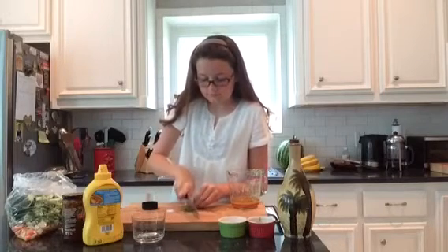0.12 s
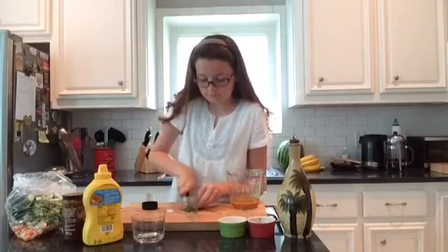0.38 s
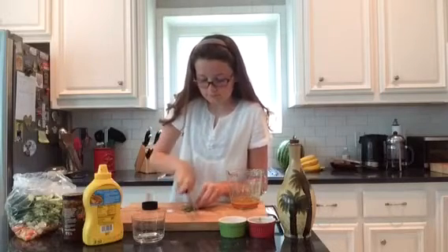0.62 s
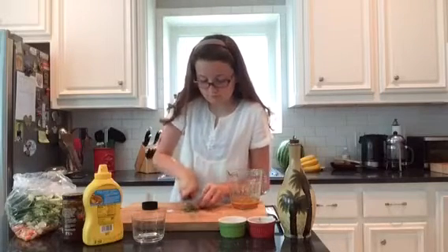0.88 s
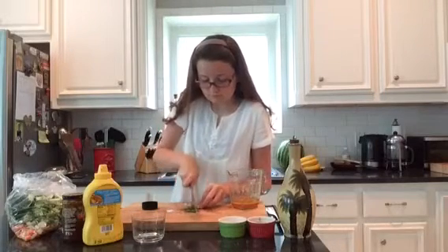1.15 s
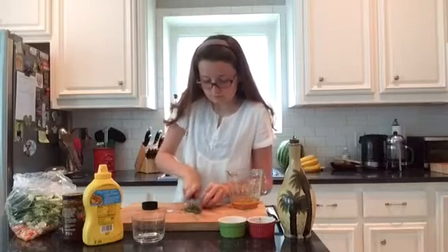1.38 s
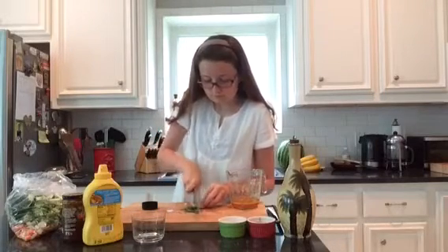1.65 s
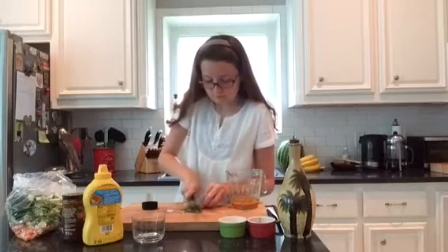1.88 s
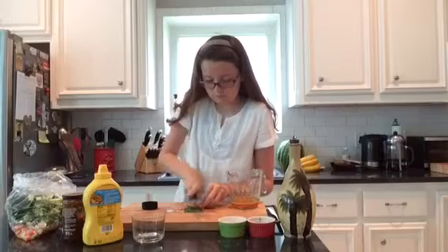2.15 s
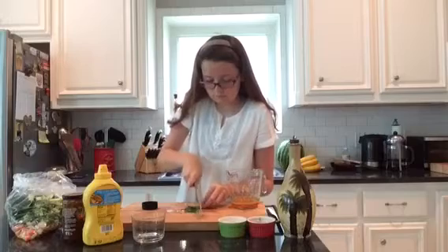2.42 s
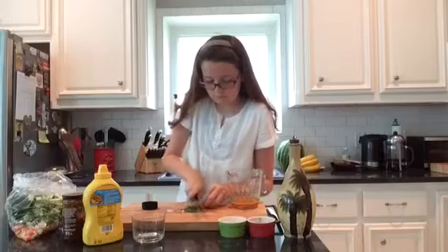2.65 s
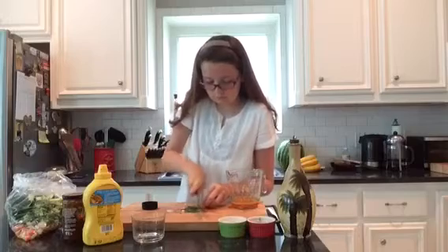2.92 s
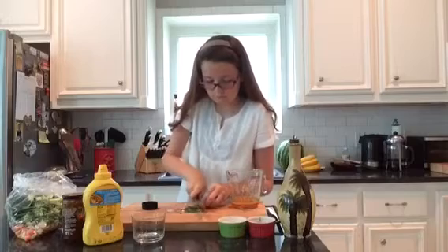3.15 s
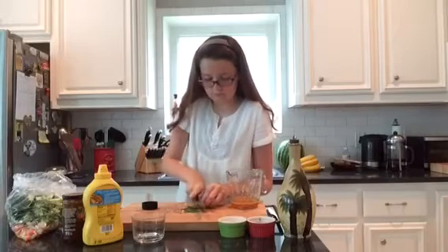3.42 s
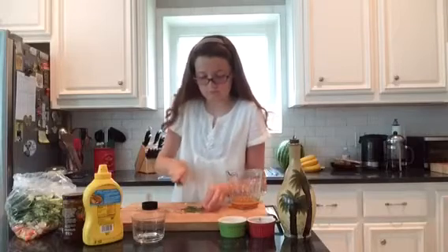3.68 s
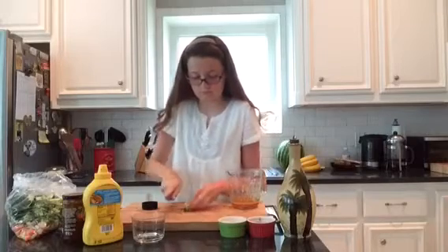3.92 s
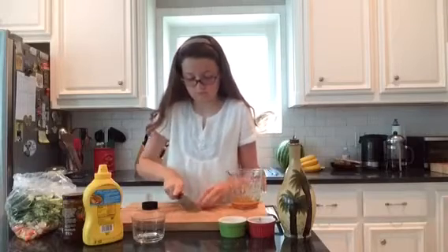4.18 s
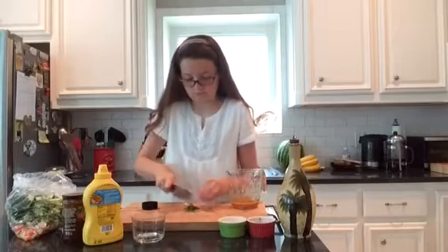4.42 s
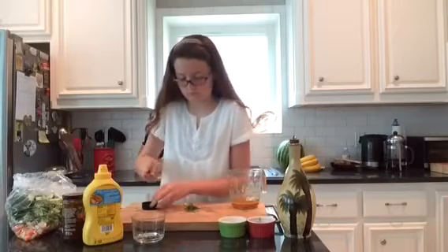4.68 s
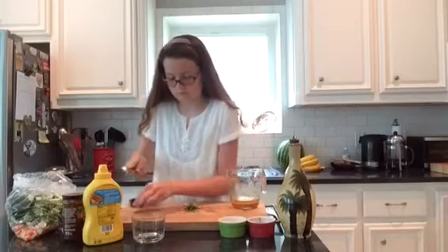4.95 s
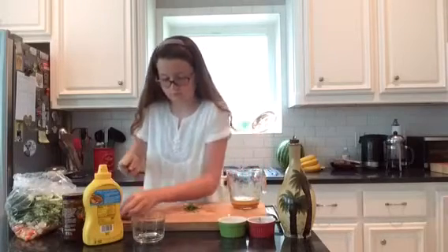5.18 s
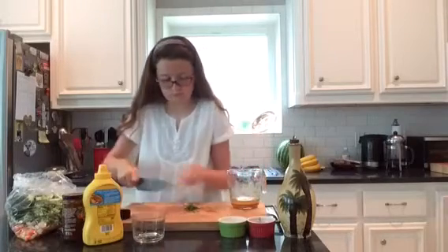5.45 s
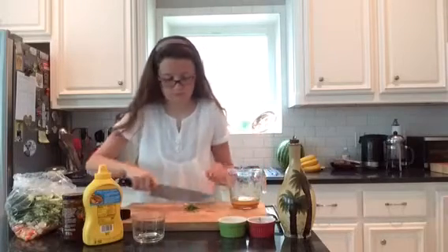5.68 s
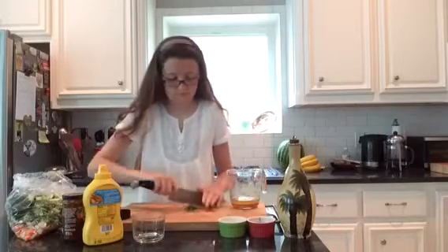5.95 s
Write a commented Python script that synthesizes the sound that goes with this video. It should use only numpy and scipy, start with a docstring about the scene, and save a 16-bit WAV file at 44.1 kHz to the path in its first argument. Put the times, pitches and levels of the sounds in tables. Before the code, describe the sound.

A knife minces herbs on a wooden board, heard from a couple of metres away in a reflective home kitchen, over dull room air and a faint low fridge hum. Light touches start at once, then firm hollow knocks land at about 0.2, 0.7, 1.1, 1.9 and 3.4 seconds, with weaker taps scattered unevenly between. Thin gritty leaf crunch, tiny bright stem snaps and brief woody scrapes of the edge fill the gaps, above a barely audible rubbing that fades after 3.2. The taps thin out, and at 4.0 a clearly louder, sharper chop rings off the walls, followed by a short scraping sweep around 4.1 to 4.3. Then mostly quiet room tone, with a minute tick near 4.9 and a small hard click with a faint brush at 5.3. At 6.0 a second loud, bright, cracking chop lands just as the sound ends.

```python
"""Mincing herbs on a wooden board

A kitchen knife minces herbs a couple of metres away. Grains of noise make the leaves crunch, noise through
the board's resonances makes the blade slide, and short pushes on those resonances make it knock. Short
bright bursts are snapping stems. A hard-walled kitchen answers with echoes and a noise tail, over a
fridge's hum and room air made of filtered noise."""
import sys
import numpy as np
from scipy import signal
from scipy.fft import rfft, irfft, next_fast_len
from scipy.io import wavfile
from scipy.ndimage import uniform_filter1d, map_coordinates

SR = 44100
rng = np.random.default_rng(int(sys.argv[2]) if len(sys.argv) > 2 else 0)


def natural_amplitude(level_db):
    """Convert a level in decibels to a linear amplitude factor, elementwise."""
    exponent = np.asarray(level_db, float) / 20
    return 10 ** exponent


def persist_wave(psi):
    """Save psi, clipped to +-1, as 16-bit WAV."""
    counts = np.round(np.clip(psi, -1, 1) * 32767).astype(np.int16)
    wavfile.write(sys.argv[1], SR, np.atleast_2d(counts).T)


N = 268128  # length in samples

# blade meeting the wood: start_s, level_db (peak of the low part), upper_db (upper modes over the low part),
# centre_hz (of the upper modes), contact_ms
BLADE_KNOCKS = [(0.03, -49, -12, 1390, 0.37), (0.07, -34.5, -18, 1280, 1), (0.196, -22.5, -30, 1420, 0.84),
                (0.459, -50, -8.5, 1340, 0.72), (0.675, -26, -69, 1440, 1), (0.909, -45, -8, 1380, 0.63),
                (1.13, -22.5, -18.5, 1430, 0.85), (1.352, -44, -25, 1400, 1),
                (1.601, -44.5, -24, 1470, 0.98), (1.654, -46.5, -25, 1470, 0.84),
                (1.781, -42, -12.5, 1330, 1), (1.91, -21.5, -26, 1340, 0.92), (2.008, -49, -14, 1340, 0.87),
                (2.11, -50.5, -5.5, 1500, 0.46), (2.234, -52.5, -8, 1920, 0.42),
                (2.362, -35.5, -19, 1350, 1), (2.477, -45.5, -19, 1330, 1), (2.661, -47, -11, 1350, 0.25),
                (2.803, -48, -12, 1950, 0.82), (2.886, -49, -21, 1450, 0.82),
                (3.055, -38.5, -15, 1330, 0.45), (3.097, -42.5, -7.5, 1820, 0.23),
                (3.293, -46.5, -16, 1900, 0.3), (3.41, -21.5, -19, 1950, 0.99),
                (3.531, -55, -15, 1400, 0.78), (3.562, -48.5, -18, 1530, 0.73),
                (3.865, -48, -7, 1400, 0.85), (4.027, -14, -5, 1330, 0.22), (5.279, -46.5, -10, 1200, 1),
                (6.0, -16.5, 1, 1510, 0.11)]
# stems snapping and small hard contacts: start_s, level_db, pitch_hz, ringing (share, 0-1)
STEM_SNAPS = [(0.037, -46, 9420, 0.4), (0.0493, -43, 11200, 0.23), (0.4579, -55, 3530, 0.05),
              (0.4977, -38.5, 6600, 0.2), (0.5178, -41, 11200, 0.2), (0.532, -43, 11000, 0.3),
              (0.588, -49, 11500, 0.35), (0.93, -53, 12000, 0.5), (0.912, -42.5, 7100, 0.13),
              (0.986, -45.5, 11100, 0.2), (1.206, -54, 8500, 0.6), (1.5093, -55.5, 6640, 0.2),
              (1.58, -59, 10000, 0.3), (1.6917, -53.5, 9600, 0.36), (1.796, -52, 10600, 0.55),
              (1.909, -55.5, 9000, 0), (2.241, -48.5, 6270, 0.1), (2.302, -42.5, 11500, 0.42),
              (3.056, -46, 10960, 0.45), (3.098, -39, 2970, 0.32), (3.4096, -36.5, 2730, 0.52),
              (4.901, -58, 9490, 0.2), (5.271, -36, 2720, 0.64), (5.9998, -46, 2920, 0.9)]
# low resonances of the board: pitch_hz, width_hz, level_db
BOARD_MODES = [(382, 60, -10), (441, 152, 4), (574, 53, 7.5), (626, 143, 6), (777, 35, 6), (995, 40, -2)]
# upper resonances of the board: pitch_hz, width_hz, level_db
UPPER_MODES = [(1003, 90, 17.5), (1196, 73, 13), (1330, 67, 19), (1416, 54, 16.5), (1500, 52, 13),
               (1690, 78, 2), (1782, 240, 14), (1950, 70, 8.5), (2410, 220, 6), (2810, 130, -4.5)]
# tone colour of tearing leaves: pitch_hz, level_db (relative)
LEAF_COLOUR = [(1180, -65), (2000, -3.5), (3620, -2.5), (4600, -6.5), (6570, -6), (10000, -2), (11600, -4),
               (15200, -14)]
# tone colour of the room air: pitch_hz, level_db (relative)
AIR_COLOUR = [(15, -71), (25, -33), (49, -2), (143, -5), (173, -6.5), (347, -6.5), (441, -11.5),
              (505, -8.5), (609, -16.5), (818, -19.5), (1690, -30), (2210, -29.5), (7190, -36.5),
              (9400, -37), (15200, -47.5)]
# bands of the fridge's hum: pitch_hz, level_db, width_hz
FRIDGE_HUM = [(64, -74.5, 21), (117.8, -70, 4.1), (174.7, -69, 5.6), (505.7, -72, 11), (9000, -92, 72)]
# echoes off counter and cupboards: delay_s, level_db
WALL_ECHOES = [(.0045, -36), (.009, -13.5), (.0135, -16.5), (.017, -16), (.021, -16.5), (.026, -18)]
# time the kitchen's tail takes to fall 60 dB: pitch_hz, decay_s
KITCHEN_DECAY = [(300, 0.92), (700, 0.32), (1400, 0.65), (3000, 0.44), (6000, 0.86), (12000, 0.23)]
# down-cuts through the leaves, and a late brush of leaves off the blade; scene() lowers both levels:
# peak_s, crunch_db (leaves), press_db (pressure on the wood)
DOWN_CUTS = [(0.04, -54, -49), (0.498, -54.5, -48), (0.911, -57, -51), (1.0, -60, -57), (1.348, -62, -58),
             (1.79, -60.5, -68), (1.909, -60, -51.5), (2.242, -57.5, -54), (2.67, -64, -59),
             (3.06, -60, -63), (3.1, -64.5, -72), (3.41, -64.5, -57.5), (5.28, -60, -71)]
# the edge drawn over the board between cuts, and once swept across the pile; scene() lowers both levels:
# end_s, length_s, rustle_db (leaves), scrape_db (wood)
BLADE_DRAWS = [(0.357, 0.082, -62.5, -66), (0.8, 0.015, -63, -61.5), (1.235, 0.013, -62.5, -60),
               (1.71, 0.062, -72, -65.5), (2.16, 0.031, -67.5, -58), (2.545, 0.044, -70.5, -65),
               (2.957, 0.025, -71, -61.5), (3.324, 0.017, -70.5, -73.5), (3.63, 0.028, -71, -67),
               (4.208, 0.11, -61, -53.5), (4.278, .04, -61.5, -57)]


def unit(x):
    """Scales a sound to an average (rms) level of 1."""
    return x / np.sqrt(np.mean(x ** 2) + 1e-20)


def peak_one(x):
    """Scales a sound to a peak of 1."""
    return x / np.abs(x).max()


def along(points, hz):
    """Reads a curve of (Hz, value) points on a log pitch axis."""
    point_hz, value = np.transpose(points)
    return np.interp(np.log(hz + 1), np.log(point_hz + 1), value)


def wobble(rate):
    """Makes a smooth random curve with `rate` random points a second."""
    points = rng.standard_normal(int(N * rate / SR) + 4)
    return map_coordinates(points, [np.arange(N) * rate / SR])


def filtered(x, response):
    """Filters x by multiplying its spectrum by a response of frequency."""
    size = next_fast_len(len(x) + SR // 2)
    spectrum = rfft(x, size) * response(np.fft.rfftfreq(size, 1 / SR))
    return irfft(spectrum, size)[:len(x)]


def resonances(modes, spread_db=0):
    """Gives the response of modes that ring after a push, each at a strength varied by spread_db."""
    change_db = rng.normal(0, 1, len(modes)) * spread_db

    def response(f):
        return sum(natural_amplitude(db + change) * 1j * f * width / (hz * hz - f * f + 1j * f * width)
                   for (hz, width, db), change in zip(modes, change_db))
    return response


def swells(end_s, hold_s, db, rise_db_s, fall_db_s):
    """Gain of events that rise, hold and fall at steady dB rates, added in power."""
    t = np.arange(N)[None] / SR
    end, hold, level = [np.reshape(column, (-1, 1)) for column in (end_s, hold_s, db)]
    early = np.maximum(end - hold - t, 0)
    late = np.maximum(t - end, 0)
    level_db = level - rise_db_s * early - fall_db_s * late
    return np.sqrt(np.sum(natural_amplitude(2 * level_db), axis=0))


def room_tone():
    """Dull room air is shaped noise; a fridge's hum is noise in slightly unsteady narrow bands."""
    air_db = -61 + 0.8 * wobble(3)
    air = natural_amplitude(air_db) * unit(filtered(rng.standard_normal(N), lambda f: natural_amplitude(along(AIR_COLOUR, f))))
    hum = [natural_amplitude(db) * unit(filtered(rng.standard_normal(N), resonances([(hz, width, 0)])))
           for hz, db, width in FRIDGE_HUM]
    return air + sum(hum)


def kitchen(x, wet_db):
    """Near surfaces echo, with a diffuse noise tail drawn afresh every quarter second for smoothness."""
    out = np.zeros(N + 2 * SR)
    size = SR // 4
    for start in range(0, N, size):
        hz, t, z = signal.stft(rng.standard_normal(SR), SR, nperseg=256)
        decay = natural_amplitude(-60 * t / along(KITCHEN_DECAY, hz)[:, None])
        tail = signal.istft(z * decay, SR, nperseg=256)[1][:SR]
        tail *= np.minimum(np.arange(SR) / SR / 0.0035, 1)  # the tail builds up over 3.5 ms
        tail *= natural_amplitude(wet_db) / np.linalg.norm(tail)
        for delay_s, db in WALL_ECHOES:
            tail[round(delay_s * SR)] += natural_amplitude(db)
        answer = signal.fftconvolve(x[start:start + size], tail)
        out[start:start + len(answer)] += answer
    return x + out[:N]


def snaps():
    """Each snap is a short bright burst of noise with a ring of a few cycles."""
    out, t = np.zeros(N + SR), np.arange(SR // 40) / SR
    treble = resonances([(7920, 8000, 0)])
    for start_s, db, hz, ringing in STEM_SNAPS:
        burst = rng.standard_normal(len(t)) * np.sqrt(t) * natural_amplitude(-60 * t / 0.012)
        mode = resonances([(hz, 800, 0)])
        ring = peak_one(filtered(burst, lambda f: mode(f) ** 2))
        click = peak_one(filtered(burst, lambda f: treble(f) ** 2))
        snap = ringing * ring + (1 - ringing) * click
        out[round(start_s * SR):][:len(t)] += natural_amplitude(db) * snap
    return out[:N]


def effort():
    """Gains of crunch, slide and scrape follow the cuts, the draws and a faint steady bed."""
    cut_s, crunch_db, press_db = np.transpose(DOWN_CUTS)
    end_s, length_s, rustle_db, scrape_db = np.transpose(BLADE_DRAWS)

    def draw(db, fall_db_s):
        return swells(end_s, length_s, db, 142, fall_db_s)

    def bed(db):
        # a faint steady rubbing lies under the strokes and fades after 3.23 s
        return swells(3.23, 3.23, db, 0, fall_db_s=32)

    scrape = draw(scrape_db, fall_db_s=94)
    crunch = swells(cut_s, 0, crunch_db, rise_db_s=450, fall_db_s=121)
    crunch = crunch + draw(rustle_db, fall_db_s=246) + bed(-84.5)
    slide = swells(cut_s, 0, press_db, rise_db_s=291, fall_db_s=81.5)
    slide = slide + natural_amplitude(-0.5) * scrape + bed(-69)  # a draw also stirs the low modes
    return crunch, slide, scrape + bed(-81)


def leaf_crunch():
    """Leaves tear in dense uneven grains, with a tone colour that varies at random over pitch and time."""
    grains = (rng.random(N) < 0.03) * natural_amplitude(3.5 * rng.standard_normal(N)) * rng.standard_normal(N)
    ticks = (rng.random(N) < 60 / SR) * rng.standard_normal(N)  # about 60 a second make the crunch gritty
    tearing = unit(grains) + 2.8 * rng.standard_normal(N) + 25 * ticks
    crunch = unit(filtered(tearing, lambda f: natural_amplitude(along(LEAF_COLOUR, f))))
    z = signal.stft(crunch, nperseg=256)[2]
    colour = uniform_filter1d(rng.standard_normal(z.shape), size=7, axis=0)  # smooth over pitch
    colour = uniform_filter1d(colour, size=9, axis=1)  # smooth over time
    crunch = unit(signal.istft(z * natural_amplitude(1.8 * unit(colour)), nperseg=256)[1][:N])
    return natural_amplitude(1.64 * wobble(70)) * crunch


def stroke():
    """Leaves crunch while the edge, sticking and slipping on the grain, rubs the board's modes."""
    crunch_gain, slide_gain, scrape_gain = effort()
    slips_db = 4 * wobble(45)
    rubbing = natural_amplitude(slips_db) * rng.standard_normal(N)
    board, upper = resonances(BOARD_MODES), resonances(UPPER_MODES)
    low_focus = resonances([(700, 600, 0)])
    high_focus = resonances([(1400, 500, 0), (2500, 1500, -9)])
    edge_mode = resonances(BOARD_MODES[4:5])  # the mode under the edge
    slide = unit(filtered(rubbing, lambda f: board(f) * low_focus(f)))
    hiss = unit(filtered(rubbing, lambda f: upper(f) * high_focus(f) ** 2))
    hiss += natural_amplitude(-5.5) * unit(filtered(rubbing, lambda f: edge_mode(f) ** 2))
    return crunch_gain * leaf_crunch() + slide_gain * slide + scrape_gain * hiss


def knocks():
    """A smooth push as long as the contact rings the board; where the edge lands picks the upper modes."""
    out, t = np.zeros(N + SR), np.arange(SR // 8) / SR
    radiates = resonances([(574, 515, 0)])  # a small board moves little air in the bass
    for start_s, db, upper_db, centre_hz, contact_ms in BLADE_KNOCKS:
        push = np.sin(np.pi * np.minimum(t / (contact_ms / 1000), 1)) ** 2
        drag = np.clip((-35 - db) / 22, 0.12, 0.8)  # light touches skid, firm chops land clean
        skid = drag * 0.049 * unit(t ** 0.24 * natural_amplitude(-60 * t / 0.04)) * rng.standard_normal(len(t))
        skid[0] = 1 - drag
        grit = np.sqrt(t) * natural_amplitude(-60 * t / 0.029) * rng.standard_normal(len(t))  # edge beds in along its length

        body = resonances(BOARD_MODES, spread_db=1.5)
        upper = resonances(UPPER_MODES, spread_db=2)
        spot = resonances([(centre_hz, 1100, 0)])
        pushed = signal.fftconvolve(skid, push)[:len(t)]
        low = peak_one(filtered(pushed, lambda f: body(f) * radiates(f) ** 2))
        high = peak_one(filtered(skid + 0.13 * peak_one(grit), lambda f: upper(f) * spot(f) ** 2))
        crack = peak_one(filtered(grit, resonances([(3000, 860, -4), (3600, 260, -3.5)])))

        # beside the low part, the edge's crack sinks as knocks grow stronger than a light touch (-46 dB)
        crack_db = upper_db - 4.5 - 0.46 * (db + 46)
        knock = low + natural_amplitude(upper_db) * high + natural_amplitude(crack_db) * crack
        out[round((start_s + 0.0012) * SR):][:len(t)] += natural_amplitude(db) * knock  # 1.2 ms after the listed start
    return out[:N]


def scene():
    """Knife and board sound in the kitchen, over its room tone."""
    knife = knocks() + snaps() + natural_amplitude(-5.5) * stroke()
    return (kitchen(knife, wet_db=-6.0) + room_tone())[None]


def top_cut(x):
    """Nothing passes above the cut-off."""
    return signal.sosfilt(signal.butter(12, 15380, fs=SR, output="sos"), x)


def record(dry):
    """The camera's band limit removes everything from 15350 Hz up."""
    mix = np.array([filtered(x, lambda f: f < 15350) for x in dry])
    return top_cut(mix)


dry = scene()
out = record(dry)
persist_wave(out)
```